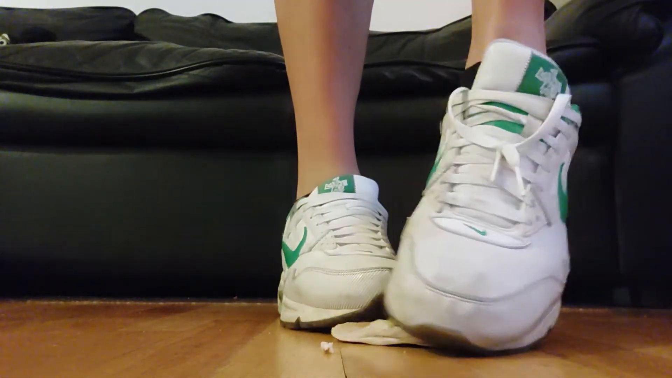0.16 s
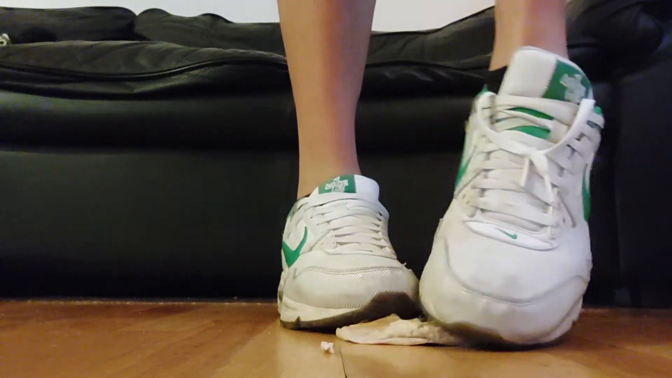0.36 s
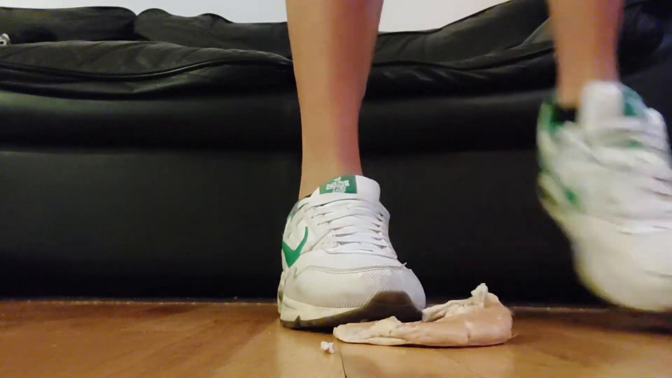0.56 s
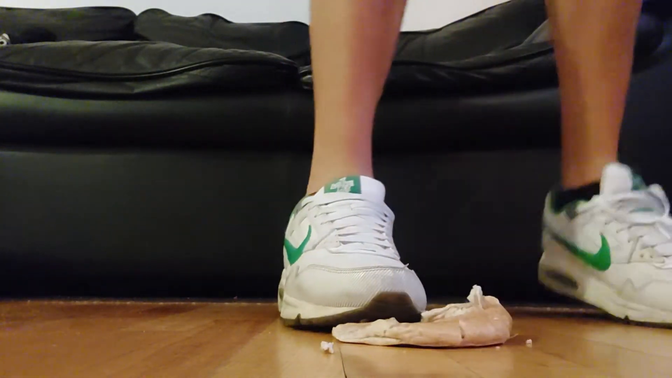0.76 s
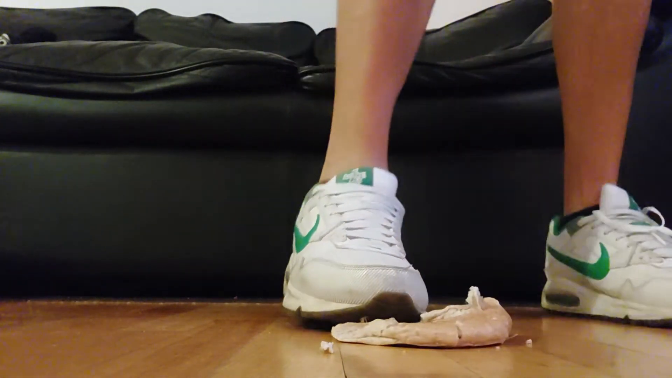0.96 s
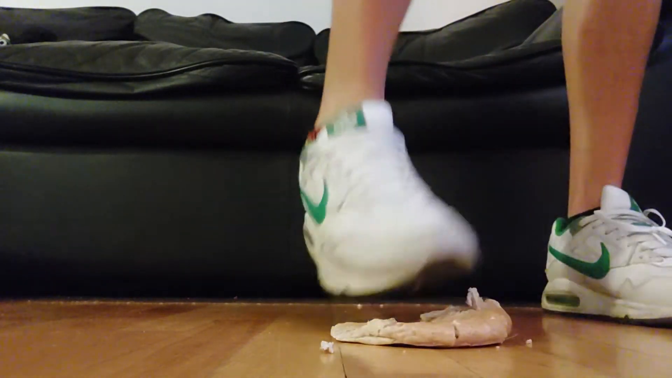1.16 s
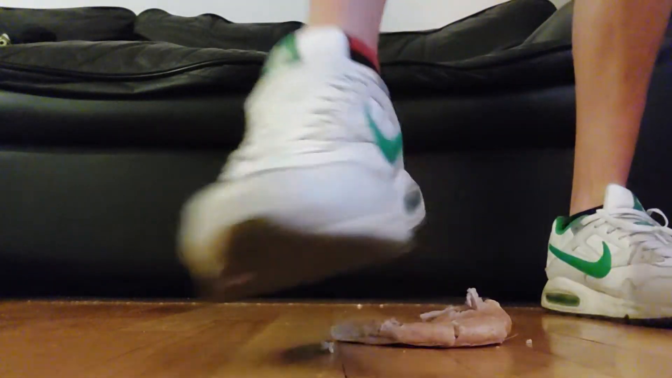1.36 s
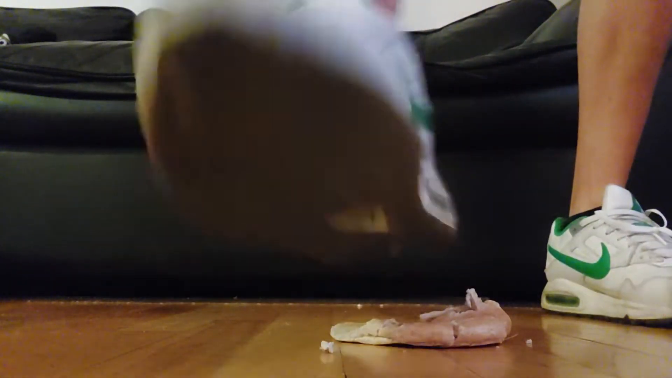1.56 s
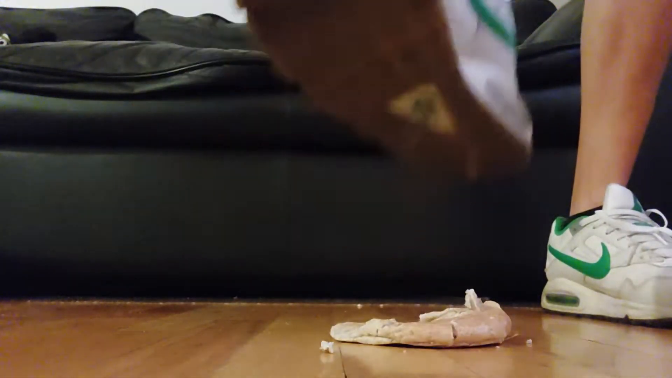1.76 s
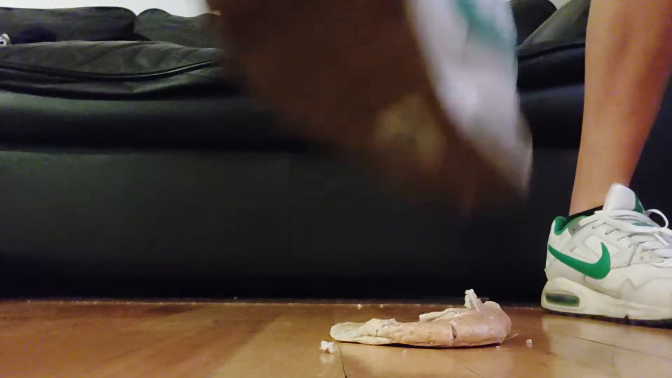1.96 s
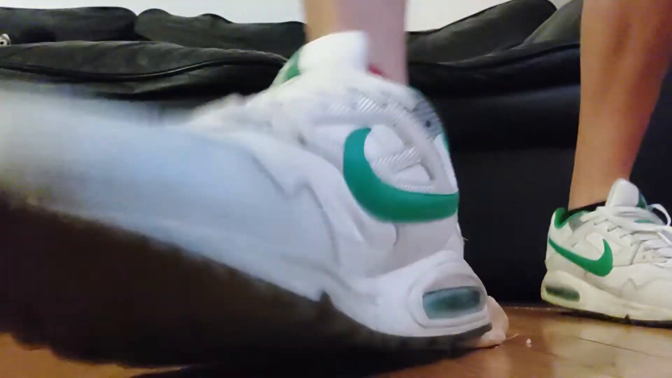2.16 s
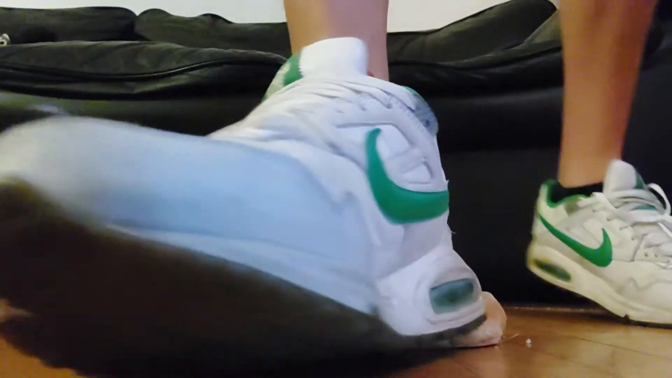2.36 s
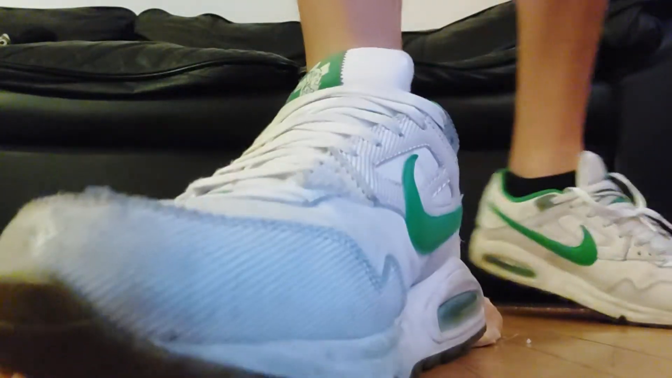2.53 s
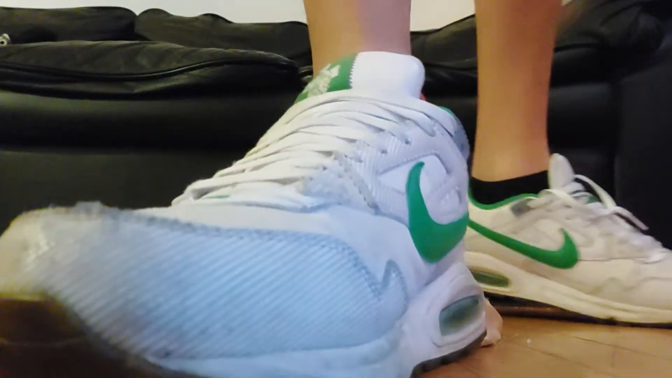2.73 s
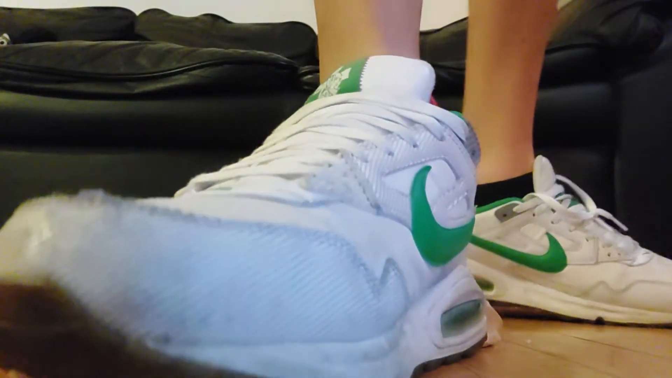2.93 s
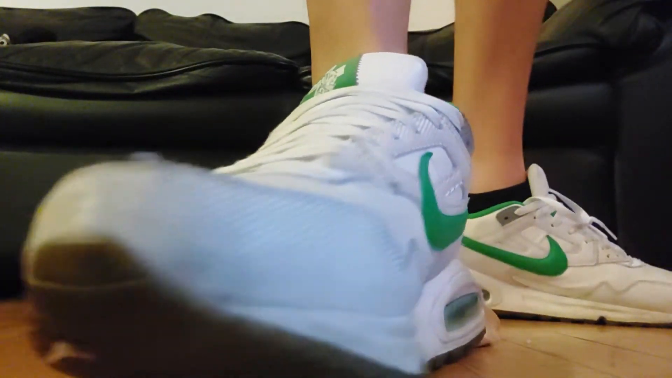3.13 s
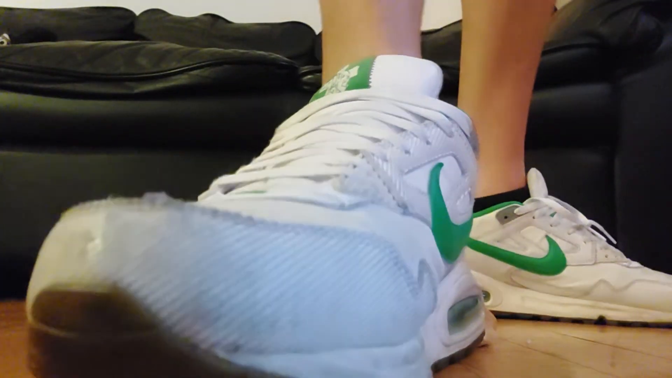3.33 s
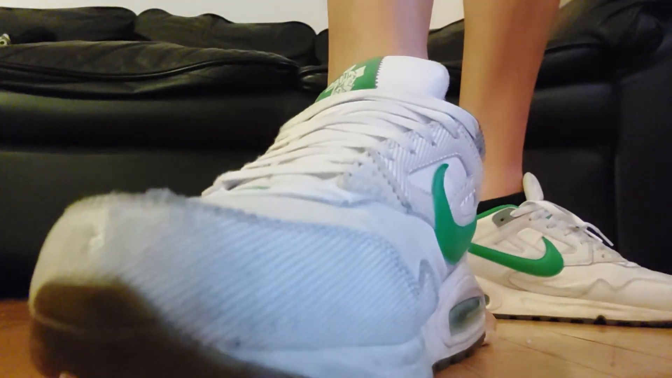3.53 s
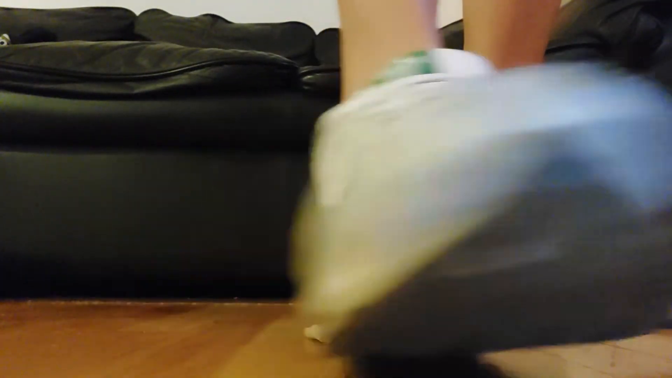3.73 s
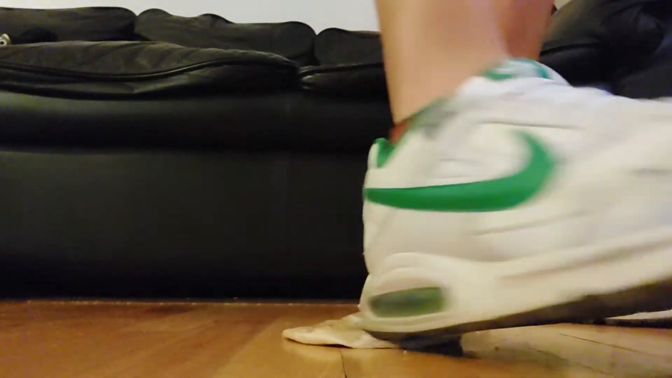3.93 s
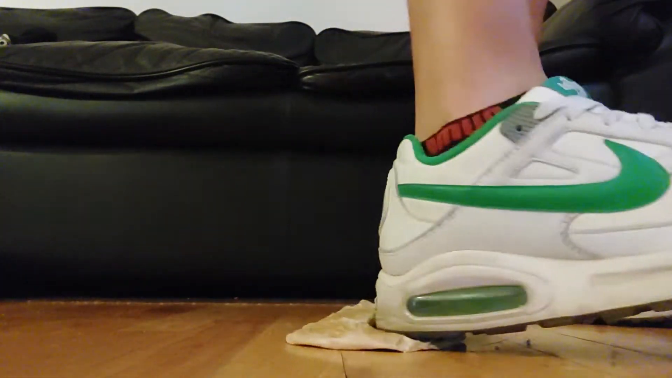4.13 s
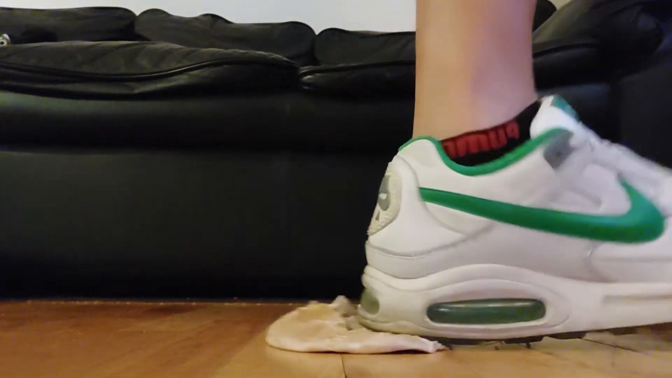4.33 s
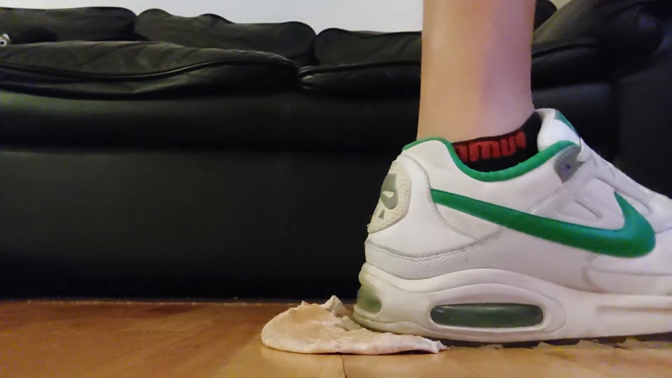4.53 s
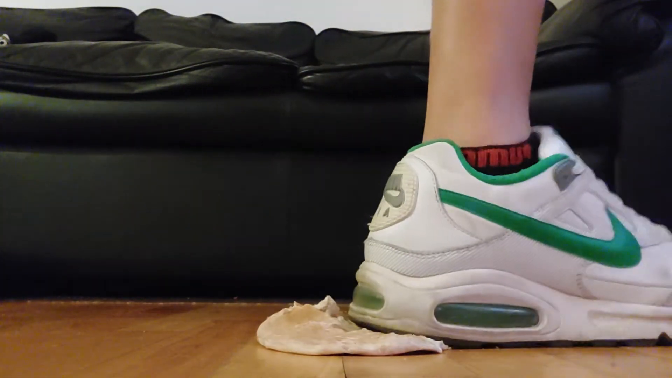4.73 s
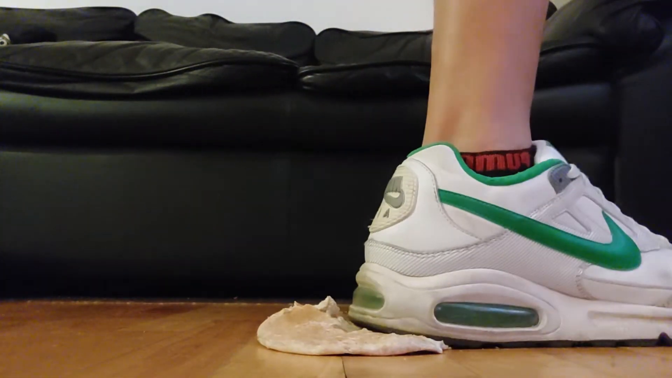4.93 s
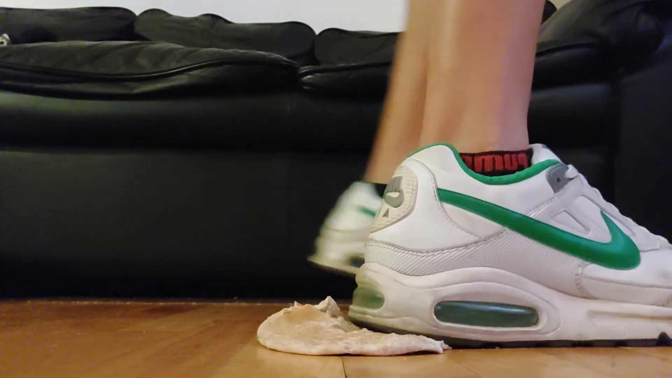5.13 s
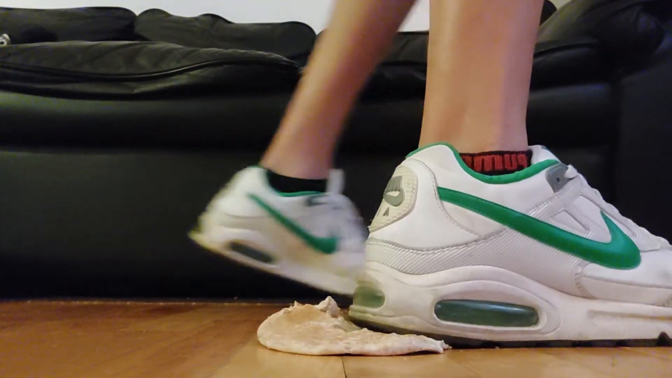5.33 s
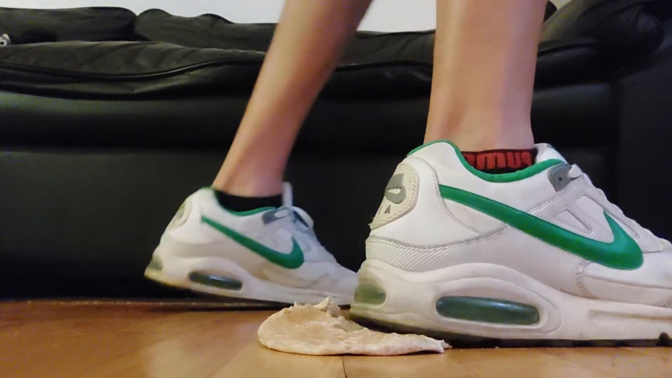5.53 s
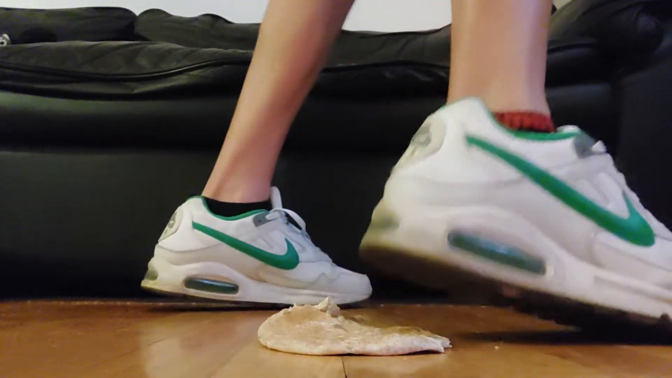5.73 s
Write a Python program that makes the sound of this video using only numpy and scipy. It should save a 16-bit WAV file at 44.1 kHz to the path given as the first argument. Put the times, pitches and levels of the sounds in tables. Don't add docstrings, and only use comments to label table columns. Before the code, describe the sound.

Close to the floor in a small room, rubber soles scuff and grind crumbly bread. A firm stomp comes early, followed by a juddering rubbery grind and a soft deep step. The heaviest, booming stomp lands around two seconds, then a dull grind. Quiet shuffles and creaking ticks follow until a short hard step and final grinding scuff. Low hum throughout.

```python
import sys
import numpy as np
from scipy import signal
from scipy.fft import rfft, irfft
from scipy.io import wavfile
from scipy.ndimage import uniform_filter1d

SR = 44100
rng = np.random.default_rng(int(sys.argv[2]) if len(sys.argv) > 2 else 0)


def how_loud(loudness_db):
    steps = np.asarray(loudness_db, float) / 20
    return 10 ** steps


def generate_wav(sig):
    pcm = np.round(np.clip(np.atleast_2d(sig).T, -1, 1) * 32767).astype(np.int16)
    wavfile.write(sys.argv[1], SR, pcm)


N = 259308

# f/Hz, level/dB, t60/s
BOARD_MODES = [(227, -22, .16), (253, 13.5, 0.23), (318, -1.5, 0.33), (332, -30, 0.14), (477, -26.5, 0.029),
               (564, -10.5, 0.12), (704, -26.5, .15)]
# f/Hz, width/Hz, level/dB
SOLE_PEAKS = [(980, 80, 0), (1470, 110, -6), (1900, 120, -12), (2150, 160, -5), (3100, 500, -14),
              (3900, 500, -16), (4820, 380, -15), (6500, 600, -19), (7400, 500, -24)]
RIGHT_LAG_S = .0003
SCUFF_PAN_DB, PAN_PER_BRIGHT_DB = 13, 0.9644


def blows():
    # t/s, thud level/dB, deep modes/dB, contact/ms, damped after/s
    stomps = [
        (0.7078, -26, 2, 2.0, 0.12),
        (1.161, -35, 18, 2.1, 0.0086),
        (2.0814, -4.5, 12, 3.0, .03),
        (2.1113, -10, 0, 2.0, .008),
        (3.049, -45.5, -15, 1.2, 0.036),
        (3.274, -38.5, -15, 2.84, 0.016),
        (5.4525, -21, -29, 0.54, 0.0235),
    ]
    # t/s, thud level/dB, deep modes/dB, contact/ms, damped after/s
    follows = [
        (0.7275, -25, 2, 2.0, 0.007),
        (2.0900, -2, -14, 2.0, .018),
        (2.149, -21, 9, 3.9, 0.3),
        (2.0788, -11, -14, 1.5, .005),
    ]
    # f/Hz, level/dB, t60/s
    deep_modes = [(63.4, -9, .25), (125.8, -26.5, 0.21), (140.6, 7, 0.32), (171.7, 4, 0.3),
                  (185, -0.5, 0.54)]
    # t/s, peak/dB, f/Hz, t60/s, left-right/dB
    clicks = [(.7064, -21, 560, .008, -4), (.7068, -36, 1300, .008, 0), (.7068, -44, 2450, .008, 4),
              (2.0782, -26, 1400, .008, 1.5), (3.4349, -34, 1220, .011, 0), (2.613, -45, 1650, .01, 4),
              (2.4492, -41, 1500, .007, 4), (5.4504, -37, 1600, .008, 3), (2.0900, -17, 480, .025, -1.5),
              (5.4502, -23, 950, .005, 1.5), (4.6245, -43, 590, .03, 0), (4.8042, -41, 560, .025, 0),
              (4.8668, -38, 800, .01, 2), (.6665, -44, 1180, .008, 3)]
    # t/s, level/dB, t60/s, left-right/dB
    slaps = [
        (0.7055, -46.5, 0.019, 0.5),
        (1.129, -56.5, 0.097, -1),
        (2.077, -37.5, 0.015, 24.5),
        (2.0791, -23.5, 0.017, 5),
        (2.0894, -36.5, 0.013, 7),
        (5.448, -67.5, 0.021, 8),
    ]
    # f/Hz, level/dB per Hz
    slap_spectrum = [(470, -34), (800, -6), (1380, 1), (1940, -5.5), (2960, -8), (3230, -11), (4570, -18),
                     (6650, -21), (8740, -32), (15700, -36)]
    mix, t = np.zeros((2, N)), np.arange(SR // 2) / SR
    floor = ring(BOARD_MODES, t)
    deep = ring(deep_modes, t)
    for s, db, deep_db, contact_ms, stop_s, sign in [(*row, 1) for row in stomps] + [(*row, -1) for row in follows]:
        push = signal.windows.hann(int(contact_ms * SR / 1000) + 3)
        thud = signal.oaconvolve(floor + how_loud(deep_db) * deep, push)[:len(t)]
        damping = 0.4 + 1.72 / (1 + np.exp(np.clip((t - stop_s) / 0.0014, -50, 50)))
        thud = peaked(signal.lfilter(*signal.butter(2, 70, "high", fs=SR), thud) * damping)
        add(mix, s, sign * how_loud(db) * thud, .6, RIGHT_LAG_S)
        add(mix, s, sign * how_loud(db - 19) * lowpass(thud, 160), 20)
    for s, db, hz, t60, pan_db in clicks:
        edge = ring([(hz, 0, t60)], t) * np.minimum(t / .0011, 1)
        add(mix, s, how_loud(db) * peaked(edge), pan_db, RIGHT_LAG_S)
    for s, db, t60, pan_db in slaps:
        decay = how_loud(-60 * t / t60) + 0.034 * how_loud(-60 * t / 0.047)
        for lean_db in (9, -9):
            slap = colour(rng.standard_normal(len(t)) * decay, slap_spectrum)
            add(mix, s, how_loud(db + 0.5) * peaked(slap), pan_db + lean_db)
    return mix


def creaks():
    # t/s, peak/dB, low knock/dB, treble re peak/dB, left-right/dB
    sole_slips = [(.033, -44, -47, -27, -4), (.03, -43, -58, -30, -9), (.484, -45, -38.5, -27, 6),
                  (.528, -46, -49, -18, 12), (.543, -48, -47, -24, 3), (.5325, -42.5, -45, -21.5, 5),
                  (.871, -54, -38.5, -11, 36.5), (1.009, -39.5, -62, -9.5, 12.5),
                  (1.097, -48.5, -59, -19, 20), (1.433, -43.5, -44, -8, -5.5), (1.464, -38, -58, -13, -6),
                  (1.882, -43.5, -65.5, -7, 1), (1.893, -39.5, -53, -13.5, -8),
                  (1.904, -48.5, -51, -5.5, -4.5), (1.907, -39, -52, -15.5, -20),
                  (1.917, -46, -42.5, -13, 6.5), (1.921, -44, -54.5, -14, -0.5),
                  (1.942, -37, -45, -11.5, -7.5), (5.615, -42, -50, -15, 2), (5.619, -42, -55, -15, 8),
                  (5.623, -44, -50, -15, 2), (5.628, -44, -82, -10, 2), (5.629, -43, -68, -8, 2),
                  (5.634, -49, -67, -7, -3), (2.055, -41.5, -58.5, -9.5, 5)]
    # t/s, peak/dB, low knock/dB, ring f/Hz, treble re peak/dB
    joint_ticks = [(.0675, -28, -35, 1090, -11.5), (.071, -38, -50, 1500, -6),
                   (0.3138, -33.5, -37.5, 1290, -20), (0.322, -43, -50, 1080, -20),
                   (0.6665, -51, -58, 1160, -22), (0.786, -40.5, -34, 555, -22),
                   (0.798, -47, -38, 500, -29), (1.088, -49, -60, 870, -16), (1.13, -46.5, -59, 517, 0.5),
                   (1.139, -43, -28.5, 517, -3), (2.209, -44.5, -34.5, 835, -16),
                   (2.4482, -42.5, -54, 1900, -9), (2.613, -43, -63, 1520, -10),
                   (2.819, -65, -63.5, 1235, -20), (3.434, -39.5, -45, 1250, -19.5),
                   (3.646, -53, -48.5, 595, -15), (3.671, -54, -49, 700, -31),
                   (3.706, -47, -53, 790, -20.5), (3.752, -50.5, -42, 650, -36.5),
                   (3.95, -50, -39, 1710, -1.5), (4.625, -46.5, -36.5, 558, -26),
                   (4.804, -56.5, -33.5, 590, -27), (4.868, -44.5, -31, 1770, -11.5),
                   (5.28, -49, -39, 1320, -8.5), (5.534, -48, -61, 800, -24), (5.576, -47, -49, 1800, -6),
                   (5.597, -46.5, -50, 1820, -1.5), (5.646, -46, -41, 900, -6), (5.649, -47, -57, 1500, -7)]
    # t/s, length/s, f/Hz, width/Hz, level/dB
    squeaks = [
        (1.71, .09, 2800, 60, -91),
        (2.17, .22, 1430, 320, -72),
    ]
    slip_hz = 975
    mix, t = np.zeros((2, N)), np.arange(SR // 5) / SR
    slips = [(s, db, knock_db, slip_hz, treble_db, pan_db) for s, db, knock_db, treble_db, pan_db in sole_slips]
    ticks = [(*row, SCUFF_PAN_DB + PAN_PER_BRIGHT_DB * row[-1]) for row in joint_ticks]
    rattle_decay = how_loud(-60 * t / .015) + .15 * how_loud(-60 * t / .08)
    knock = np.diff(ring(BOARD_MODES, t) * how_loud(-60 * t / 0.018) * np.minimum(t / 0.0012, 1), prepend=0)
    knock = peaked(lowpass(knock, 2000))
    for s, db, knock_db, hz, treble_db, pan_db in slips + ticks:
        rattle_gain = .08 + .05 * (hz == slip_hz)
        rattle = rng.standard_normal(len(t)) * rattle_gain * rattle_decay - (t == 0)
        in_sole = .1 + np.exp(-(np.log(hz / SOLE_PEAKS[0][0]) / .1) ** 2)
        board = resonate(resonate(rattle, [(hz, 0.47 * hz, -4.0)]), [(hz, 1.4 * hz, 0)])
        dull = lowpass(in_sole * resonate(rattle, SOLE_PEAKS[:4]) + board, 2300)
        crisp = lowpass(resonate(rattle, SOLE_PEAKS[4:]), 6300) + .009 * np.diff(rattle, prepend=0)
        add(mix, s, how_loud(db) * (peaked(dull) + how_loud(treble_db) * peaked(crisp)), pan_db)
        add(mix, s, -how_loud(knock_db) * knock, pan_db / 4, RIGHT_LAG_S)
    for s, length_s, hz, width_hz, db in squeaks:
        hiss = rng.standard_normal(round(length_s * SR))
        squeak = resonate(resonate(hiss, [(hz, width_hz, 0)]), [(hz, width_hz, 0)])
        add(mix, s, how_loud(db) * evened(squeak) * signal.windows.tukey(len(hiss), .5), 3.0)
    return mix


def judder():
    # start/s, end/s, rate/Hz, level/dB
    trains = [
        (.9014, .931, 224, -43),
        (.9327, .955, 203, -38),
        (.9573, .996, 141, -36),
        (.9988, 1.012, 177, -41),
        (1.0196, 1.049, 150, -41),
    ]
    jolt_ms, ring_db = .45, -9
    mix, t = np.zeros((2, N)), np.arange(SR // 20) / SR
    u = (t - .0015) * 1000 / jolt_ms
    jolt = (1 - u ** 2) * np.exp(-u ** 2 / 2)
    sole = peaked(lowpass(resonate(1. * (t == 0), SOLE_PEAKS), 5000))
    for start, end, rate_hz, db in trains:
        for s in np.arange(start, end, 1 / rate_hz) - .0015:
            late_s, size_db = rng.standard_normal(2) * (.00015, 1.5)
            add(mix, s + late_s, how_loud(db + size_db) * jolt, -8)
            add(mix, s + late_s, -how_loud(db + size_db + ring_db) * sole, 1.5)
    return mix


def drag():
    # peak t/s, level/dB, rise/s, fall/s
    rustles = [(0.0, -71.5, .1, 0.23), (.27, -77.5, 0.035, 0.26), (.33, -77.5, 0.3, .08),
               (.54, -77, 0.17, 0.17), (.71, -84.5, 0.024, 4.1), (.95, -80.5, .8, 0.4),
               (1.16, -69.5, .08, 0.033), (1.46, -90, 0.064, 0.18), (1.68, -90.5, 0.19, 0.33),
               (1.9, -82.5, 0.043, 0.28), (2.1, -91, 0.08, 0.019), (2.48, -79, 0.22, 0.21),
               (2.865, -91.5, 0.45, 0.051), (3.41, -95.5, 0.51, 0.21), (3.68, -92.5, .12, .9),
               (3.98, -90.5, 0.78, 0.45), (4.33, -83.5, 0.075, 0.28), (4.4, -86.5, 0.7, 0.12),
               (4.9, -88, 0.94, 1.5), (5.48, -79.5, 0.039, 0.15), (5.59, -76, 0.048, 0.24),
               (5.64, -85, 0.23, 0.096)]
    # f/Hz, level/dB
    scrape_spectrum = [(350, -23.5), (600, -3.5), (988, -12), (1360, -11), (2160, -12.5), (2360, -12.5),
                       (9000, -37.5), (11700, -64.5), (19800, -120)]
    # f/Hz, level/dB per Hz
    fizz_spectrum = [(3530, -29), (6000, -1), (7670, 0), (8970, -5), (10500, -4), (12100, -1),
                     (15700, -3.5)]
    slip_rate_hz = 320
    level_db, bright_db, pan_db, hollow_db = strokes()
    fizz_db = swells_db(rustles)
    clumps = uniform_filter1d(uniform_filter1d(rng.standard_normal(N), 350), 350)
    level_db = level_db + 2.2 * evened(clumps)

    wander_db = 1.7 * evened(uniform_filter1d(rng.standard_normal(N), 300))
    turns = np.cumsum(slip_rate_hz * how_loud(wander_db)) / SR
    slips = np.diff(np.floor(turns), prepend=0) * how_loud(1.2 * rng.standard_normal(N))
    puffs = signal.lfilter([1], [1, -.975], slips) * rng.standard_normal((2, N))
    grit = rng.standard_normal(N) + rng.standard_normal((2, N))

    hollow = lowpass(resonate(evened(slips + .2 * puffs) + .55 * grit, SOLE_PEAKS), 7800)
    scrape = colour(grit + 0.13 * evened(puffs), scrape_spectrum)
    share = how_loud(hollow_db - 4)
    body = (share * evened(hollow) + evened(scrape)) / np.sqrt(1 + share ** 2)
    low = lowpass(lowpass(body, 4100), 4100)
    high = lowpass(signal.lfilter(*signal.butter(3, 2600, "high", fs=SR), body), 6500)
    fizz = colour(0.19 * evened(puffs) + rng.standard_normal((2, N)), fizz_spectrum)

    layers = how_loud(level_db - 0.5) * evened(low)
    layers = layers + how_loud(level_db + bright_db) * evened(high)
    layers = layers + how_loud(fizz_db + 7.0) * evened(fizz)
    return how_loud(np.array([pan_db, -pan_db]) / 2) * layers


def strokes():
    # peak t/s, level/dB, rise/s, fall/s, brightness/dB
    scuffs = [(0.0, -47, 0.11, 0.15, -7), (0.312, -52.5, 0.12, 0.084, -4.5), (.54, -59.5, 0.22, 0.16, -3),
              (0.711, -54.5, 0.0053, 0.32, -7), (1.14, -62.5, 0.59, 0.15, -3), (1.68, -74.5, 0.91, .35, -7),
              (2.09, -54, 0.064, 0.19, -5), (2.3, -69, .3, 1, -6.5), (3.19, -77.5, 0.17, 0.14, 5),
              (3.3, -76, 0.11, 0.55, -10), (3.459, -65.5, 0.058, 0.1, -10), (3.671, -72.5, 0.044, 0.6, -2),
              (3.77, -66.5, 0.16, 0.23, -0.9), (3.98, -67, 0.36, 0.23, -1.5),
              (4.339, -66, 0.075, 0.17, -2.5), (4.39, -64, 0.21, .06, -5), (4.64, -72.5, 0.078, 0.24, -5),
              (4.872, -59.5, 0.025, 0.16, -3.5), (4.81, -68, 0.017, .3, -8), (5.15, -82.5, 1, 0.84, -5),
              (5.3, -73.5, 0.074, 0.086, -3), (5.454, -54, 0.0055, 0.14, -11.5),
              (5.561, -59, 0.05, 0.39, -8), (5.8, -67.5, 0.66, 0.27, -7.5)]
    # start/s, hold/s, level/dB, fall/s, brightness/dB
    grinds = [
        (0.911, 0.12, -47, 0.032, -8),
        (0.995, 0.041, -53, 0.079, -10.5),
        (1.16, .012, -66.5, .03, 0.5),
        (1.46, 0.0099, -60.5, 0.083, -1.5),
        (1.905, 0.035, -63.5, 0.11, 2),
        (2.399, 0.18, -56.5, 0.036, -7),
        (2.466, 0.036, -61, 0.25, -5.5),
        (5.625, 0.024, -54.5, 0.063, -5),
    ]
    rise_s = .035
    power = np.array([swell(*row[:4]) for row in scuffs]
                     + [swell(s, db, rise_s, fall, hold) for s, hold, db, fall, _ in grinds])
    bright_db = np.array([row[4] for row in [*scuffs, *grinds]])
    is_grind = np.arange(len(bright_db)) >= len(scuffs)
    ring_db = np.where(is_grind, 3.5, -9.5)
    pan_db = np.where(is_grind, 6.5, SCUFF_PAN_DB) + PAN_PER_BRIGHT_DB * bright_db
    total = power.sum(0)
    means = np.array([bright_db, pan_db, ring_db]) @ power / total
    return [per_sample(v) for v in (10 * np.log10(total), *means)]


def weight():
    # peak t/s, level/dB, rise/s, fall/s
    shifts = [(0.0, -46, .1, 0.23), (.31, -50, 0.25, 0.39), (.53, -45.5, 0.063, 0.3),
              (.71, -39, 0.0076, 0.36), (1.03, -43.5, 0.46, 0.42), (1.48, -52.5, 0.27, 0.55),
              (1.68, -57, 0.15, 0.086), (1.91, -52, 0.19, 0.35), (2.08, -43.5, 0.071, 0.28),
              (2.56, -47, 0.33, 0.047), (2.75, -67.5, 0.25, 0.55), (3.1, -62.5, 0.12, 0.79),
              (3.31, -60.5, 0.3, .9), (3.65, -53, 0.13, 1.5), (3.96, -50, 0.41, 0.16),
              (4.26, -49.5, 0.14, 0.46), (4.54, -65, 0.16, 0.31), (4.86, -48, 0.37, 0.28),
              (5.07, -57, 0.12, 1.1), (5.35, -65, 1, 0.84), (5.49, -51.5, 0.064, 0.77),
              (5.65, -43.5, 0.34, 0.05), (5.88, -51.5, 0.74, .45)]
    # f/Hz, level/dB per Hz
    rumble_spectrum = [(15, -62.5), (25, -2.5), (64, -13.5), (114, -8.5), (267, 1), (315, -7.5), (383, -2),
                       (472, -11), (549, -11), (900, -27.5), (1170, -55), (1980, -120)]
    # f/Hz, correlation/1
    bass_likeness = [(60, 0.46), (300, 0.85), (900, 0.077)]
    lumps_db = 1.5 * evened(uniform_filter1d(uniform_filter1d(rng.standard_normal(N), 500), 500))
    return how_loud(swells_db(shifts)) * evened(colour(pair(bass_likeness) * how_loud(lumps_db), rumble_spectrum))


def hum():
    # f/Hz, level/dB per Hz
    hum_spectrum = [(18, -69), (30, -17.5), (160, -24), (270, 0), (341, -14), (432, -0.5), (561, -36.5),
                    (691, -29), (945, -44), (1050, -29), (2910, -49.5), (7460, -41.5), (9430, -51.5),
                    (15500, -52.5)]
    # f/Hz, correlation/1
    hum_likeness = [(60, 1), (180, 0.91), (550, 0.46), (1650, -1.8), (4970, -0.36), (15000, -0.068)]
    # f/Hz, level/dB
    whines = [(119, -77.5), (269, -65.5), (5389, -99.5), (7440, -103)]
    t = np.arange(N) / SR
    lines = np.zeros(N)
    for hz, db in whines:
        drift = 4.8 * np.cumsum(rng.standard_normal(N)) / np.sqrt(SR)
        lines += how_loud(db) * np.sqrt(2) * np.sin(2 * np.pi * hz * t + drift)
    return how_loud(-60) * evened(colour(pair(hum_likeness), hum_spectrum)) + lines


def room(x):
    # f/Hz, level/dB
    echo_gain = [(100, -11.5), (350, -16), (700, -2), (8000, -3.5)]
    # f/Hz, t60/s
    echo_t60 = [(150, 0.46), (600, 0.3), (2000, 0.2), (8000, 0.18)]
    taps = np.zeros((2, SR // 2))
    at = np.arange(200, SR // 2 - 20, 20) + rng.integers(0, 20, (2, (SR // 2 - 201) // 20))
    np.put_along_axis(taps, at, rng.choice([-1., 1.], at.shape), 1)
    hz, t, z = signal.stft(taps, SR, nperseg=256)
    z = z * how_loud(read(echo_gain, hz)[:, None] - 60 * t / read(echo_t60, hz)[:, None])
    z[1] = np.where(hz[:, None] < 450, z[0], z[1])
    tail = signal.istft(z, SR, nperseg=256)[1]
    return signal.fftconvolve(x.mean(0)[None], tail / np.linalg.norm(tail[0]), axes=1)[:, :N]


def swell(peak, db, rise, fall, hold=0):
    t = np.arange(0, N / SR + .01, .001)
    before = (peak - t) / max(rise, .005)
    after = (t - peak - hold) / max(fall, .005)
    away = np.maximum(np.maximum(before, after), 0)
    return how_loud(2 * (db - 20 * away)) + 1e-30


def per_sample(v):
    return np.interp(np.arange(N) / SR * 1000, np.arange(len(v)), v)


def swells_db(rows):
    return per_sample(10 * np.log10(sum(swell(*row) for row in rows)))


def ring(modes, t):
    return sum(how_loud(db - 60 * t / t60) * np.sin(2 * np.pi * hz * t) for hz, db, t60 in modes)


def resonate(x, peaks):
    return sum((-1) ** k * how_loud(db) * signal.lfilter(*signal.iirpeak(hz, hz / width, SR), x)
               for k, (hz, width, db) in enumerate(peaks))


def lowpass(x, hz):
    return signal.lfilter(*signal.butter(2, min(hz, SR / 2.2), fs=SR), x)


def read(points, hz):
    f, value = np.transpose(points)
    return np.interp(np.log(hz + 1), np.log(f + 1), value)


def colour(x, points):
    gain_db = np.maximum(read(points, abs(np.fft.fftfreq(4096, 1 / SR))), -100)
    log_gain = np.log(how_loud(gain_db))
    taps = np.fft.ifft(np.exp(log_gain - 1j * signal.hilbert(log_gain).imag)).real[:2048]
    return signal.oaconvolve(x, taps.reshape((1,) * (x.ndim - 1) + (-1,)), axes=-1)[..., :x.shape[-1]]


def pair(same):
    a, b = rfft(rng.standard_normal((2, N)))
    c = np.clip(read(same, np.fft.rfftfreq(N, 1 / SR)), -1, 1)
    return irfft(np.array([a, c * a + np.sqrt(1 - c ** 2) * b]), N)


def evened(x):
    return x / np.sqrt(np.mean(x ** 2) + 1e-20)


def peaked(x):
    return x / (abs(x).max() + 1e-12)


def add(mix, s, sound, pan_db, lag_s=0):
    for side, db, at in zip(mix, (pan_db / 2, -pan_db / 2), (s, s + lag_s)):
        part = side[round(at * SR):][:len(sound)]
        part += sound[:len(part)] * how_loud(db)


def scene():
    hits = blows() + creaks()
    return hits + how_loud(-10.0) * room(hits) + judder() + drag() + weight() + hum()


def low_pass(x):
    return signal.sosfilt(signal.butter(12, 15850, fs=SR, output="sos"), x)


def record(dry):
    mic_hz = 87.5
    mix = signal.lfilter(*signal.butter(2, mic_hz, "high", fs=SR), dry)
    return low_pass(mix)


dry = scene()
out = record(dry)
generate_wav(out)
```